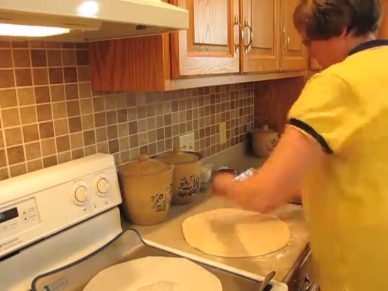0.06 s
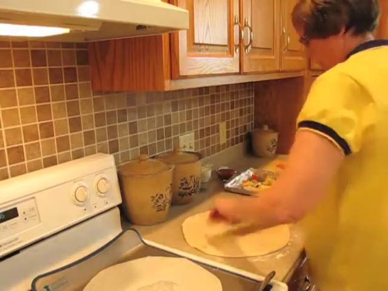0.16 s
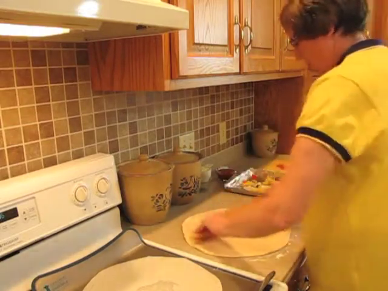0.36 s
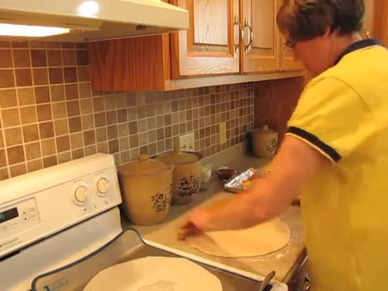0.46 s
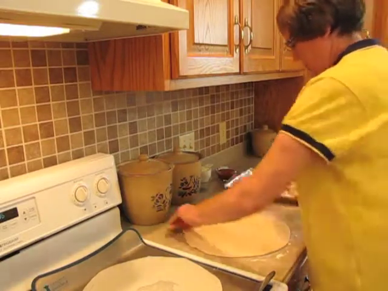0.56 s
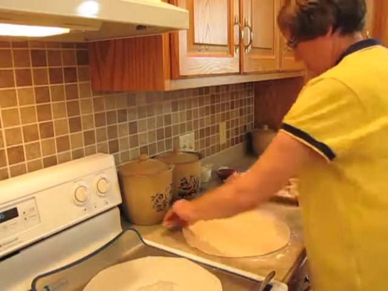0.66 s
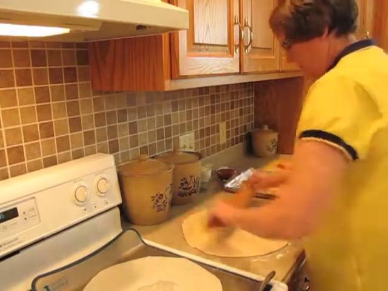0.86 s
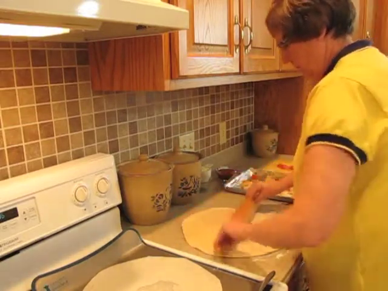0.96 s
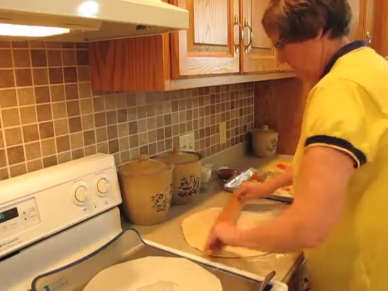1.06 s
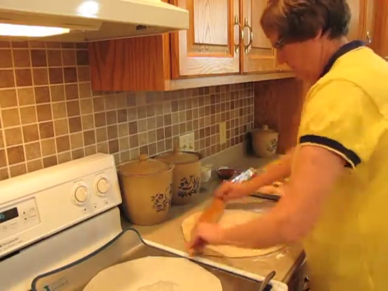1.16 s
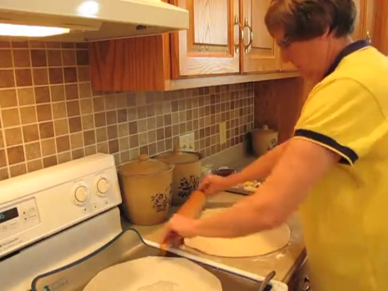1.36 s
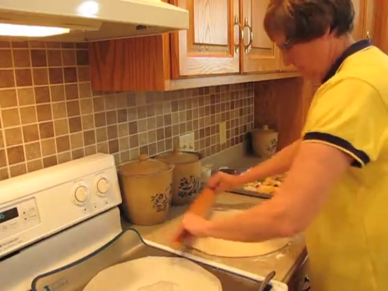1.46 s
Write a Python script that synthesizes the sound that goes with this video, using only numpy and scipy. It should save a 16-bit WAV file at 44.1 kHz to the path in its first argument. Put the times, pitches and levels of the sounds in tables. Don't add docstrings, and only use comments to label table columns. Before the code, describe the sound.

Rolling pin on a counter: brief axle rattle, one loud hard knock with a bright room tail, quieter rolling, sharp metallic clicks, then a soft thud and more rattling strokes; close small stereo microphone, slightly overloaded, faint air hush.

```python
import sys
import numpy as np
from scipy import signal
from scipy.fft import rfft, irfft, next_fast_len
from scipy.io import wavfile
from scipy.ndimage import map_coordinates

SR = 44100
rng = np.random.default_rng(int(sys.argv[2]) if len(sys.argv) > 2 else 0)


def generate_wav(sig):
    pcm = np.round(np.clip(np.atleast_2d(sig).T, -1, 1) * 32767).astype(np.int16)
    wavfile.write(sys.argv[1], SR, pcm)


def ratio(d):
    e = np.asarray(d, float) / 20
    return 10 ** e


N = 66150
KNOCK_S = 0.2392


def unit(x):
    return x / np.sqrt(np.mean(x ** 2) + 1e-20)


def along(points, hz):
    f, v = np.transpose(points)
    return np.interp(np.log(hz + 1), np.log(f + 1), v)


def filtered(x, response):
    m = next_fast_len(x.shape[-1] + SR // 4)
    spectrum = rfft(x, m) * response(np.fft.rfftfreq(m, 1 / SR))
    return irfft(spectrum, m)[..., :x.shape[-1]]


def shaped_noise(points, channels=()):
    return filtered(rng.standard_normal((*channels, N)), lambda hz: ratio(along(points, hz)))


def resonate(x, peaks):
    def response(f):
        total = 0
        for k, (centre, width, db) in enumerate(peaks):
            band = 1j * f * width
            total = total + (-1) ** k * ratio(db) * band / (centre * centre - f * f + band)
        return total
    return filtered(x, response)


def ring(modes, start_s, rise_s):
    t = np.maximum(np.arange(N) / SR - start_s, 0)
    body = sum(ratio(db - 60 * t / t60) * np.sin(2 * np.pi * hz * t) for hz, db, t60 in modes)
    return (1 - np.exp(-t / rise_s)) * body


# f/Hz, correlation
LIKENESS = [(60, 0.69), (300, 0.91), (700, 0.77), (1400, 0.69), (3100, -0.062), (6800, 0.094),
            (15000, 0.091)]


def spread(pair, share=1):
    def rotation(hz):
        angle = share * np.arccos(np.clip(along(LIKENESS, hz), -1, 1)) / 2
        return np.array([np.cos(angle), np.sin(angle)])
    mid, side = filtered(pair, rotation)
    return np.array([mid + side, mid - side])


# f/Hz, level/dB per Hz
AIR_SPECTRUM = [(25, 0), (120, 0.5), (600, 5), (1500, 8.5), (2700, -1.5), (5000, -1), (12000, -14.5),
                (16000, -26)]
AIR_DB = -55


def hush():
    return ratio(AIR_DB) * unit(spread(shaped_noise(AIR_SPECTRUM, (2,))))


CLICKS_PER_S, CLICK_SPREAD_DB = 6000, 2


def chatter():
    hit = rng.random(N) < CLICKS_PER_S / SR
    sign = np.sign(rng.standard_normal(N))
    return unit(hit * sign * ratio(CLICK_SPREAD_DB * rng.standard_normal(N)))


# t/s, peak level/dB, length/s, wood/dB, brightness/dB
AXLE_JOLTS = [(0.0505, -24, 0.015, 9.5, -1), (0.066, -34, 0.0042, -6, -10), (0.075, -33, 0.011, 16, 9.5),
              (0.6642, -13.5, 0.0027, -28, -1), (0.6688, -15, 0.0065, -32, -0.5),
              (0.6766, -16.5, 0.0029, -3.5, -3.5), (0.7924, -31, 0.0051, -10, 14.5),
              (0.8085, -30, 0.0082, -2, 0), (1.0026, -16.5, 0.01, -3, -1.5), (1.0078, -16, 0.0047, 8, 7),
              (1.013, -18.5, 0.004, -8, 5), (1.0163, -18.5, 0.0048, 16, 10), (1.028, -24.5, 0.01, 13, 0),
              (1.106, -26.5, 0.013, -4, 8.5), (1.2265, -30, 0.019, -2, 6.5),
              (1.3344, -20, 0.0058, 11.5, 6.5), (1.339, -18, 0.0067, 7, 2), (1.349, -23.5, 0.014, -2, -13)]
# t/s, peak level/dB, wood/dB, brightness/dB
MORE_AXLE_JOLTS = [(0.01, -46.5, 21.5, 12), (0.03, -43, 27, 11.5), (0.101, -38, 22, -13), (0.112, -56, 5, -12),
                   (0.137, -29.5, 1.5, -4), (0.147, -42, 4, 8), (0.199, -32.5, 8, 6.5), (0.453, -50.5, 8.5, 21),
                   (.489, -39.5, 8, 14), (0.532, -39.5, 6, 14), (.572, -40, 0, 11), (.586, -27.5, 0, 5.5),
                   (0.6314, -47.5, 17, 20.5), (1.0687, -18, 10.5, -10), (1.12, -31.5, 12, 5),
                   (1.154, -55, -13.5, 37), (1.174, -30, 16, 1), (1.197, -40.5, 10, 19.5),
                   (1.2054, -40, 14, 17.5), (1.2572, -36.5, 1, 19.5), (1.279, -32, 7, 12.5),
                   (1.298, -39, 20, 18), (1.316, -33.5, 11, 9.5), (1.383, -30.5, 10, -14), (1.4785, -30.5, 1, 9)]
# t/s, level/dB
ROLL_EFFORT = [(0, -42.5), (.05, -41.5), (.16, -55.5), (.2, -68), (.3, -33.5), (.45, -42.5), (.6, -48.5),
               (.7, -47), (.82, -50.5), (.99, -63), (1.02, -37), (1.1, -51), (1.18, -36), (1.3, -37),
               (1.4, -52), (1.47, -52), (1.5, -46)]
# f/Hz, width/Hz, level/dB
AXLE_LOW = [(2475, 139, 3), (2995, 226, 5), (3540, 236, -4.5), (3760, 193, -4.5), (2197, 410, -7)]
# f/Hz, width/Hz, level/dB
AXLE_HIGH = [(4350, 730, -10.5), (5150, 280, -0.5), (5877, 276, -2.5), (7400, 210, -2), (8250, 610, -5.5),
             (10070, 9500, -12), (6400, 9200, -14.5)]
# f/Hz, width/Hz, level/dB
BARREL_MODES = [(585, 80, -1), (1110, 80, 0), (1520, 180, 0), (1850, 200, -1), (330, 200, -10)]
TICK_S, RISE_S, FALL_POWER = 0.0076, 0.0006, 1.5
JOLT_DB, JOLT_BARREL_DB, JOLT_HIGH_DB = -9.5, -16, -6.5
ROLL_DB, ROLL_BARREL_DB, ROLL_HIGH_DB = -8, -12.5, -6.5
ROLL_LUMP_DB, LUMPS_PER_S = 5, 90


def axle():
    t = np.arange(N) / SR
    lumps = map_coordinates(rng.standard_normal(200), [t * LUMPS_PER_S])
    roll = ratio(np.interp(t, *np.transpose(ROLL_EFFORT)) + ROLL_DB + ROLL_LUMP_DB * lumps)
    drive = roll * ratio([[0], [ROLL_BARREL_DB], [ROLL_HIGH_DB]])
    ticks = [(s, db, TICK_S, wood_db, bright_db) for s, db, wood_db, bright_db in MORE_AXLE_JOLTS]
    for s, db, length_s, wood_db, bright_db in list(AXLE_JOLTS) + ticks:
        u = np.maximum(t - s + RISE_S, 0)
        burst = np.minimum(u / RISE_S, 1) * np.exp(-(u / max(length_s, 0.002)) ** FALL_POWER)
        colour = ratio([[0], [wood_db + JOLT_BARREL_DB], [bright_db + JOLT_HIGH_DB]])
        drive = drive + ratio(db + JOLT_DB) * burst * colour
    hits = chatter()
    rattle = 0
    for effort, peaks in zip(drive, (AXLE_LOW, BARREL_MODES, AXLE_HIGH)):
        rattle = rattle + resonate(effort * hits, peaks) / np.std(resonate(hits, peaks))
    return rattle


# t/s, level/dB, f/Hz, t60/s
MODE_TAPS = [(.054, -33.5, 960, 0.043), (.587, -29.5, 3740, .03), (.667, -42.5, 509, 0.1),
             (0.792, -35, 6130, 0.029), (.81, -47, 515, 0.1), (0.808, -34.5, 1843, 0.037),
             (.809, -35.5, 1557, 0.036), (1.008, -30, 579, 0.082), (1.01, -26, 1814, 0.11),
             (1.01, -35.5, 1078, 0.076), (1.177, -22.5, 3770, 0.025), (1.231, -35, 548, 0.063),
             (1.231, -23, 3780, 0.03), (1.233, -31, 1070, 0.018), (1.336, -35, 1620, 0.021),
             (.052, -22, 2606, 0.071), (.055, -22.5, 3060, 0.067), (0.081, -36, 2700, .025),
             (0.1, -36, 3010, .04), (0.112, -29, 2620, 0.023), (0.12, -44, 2530, 0.017),
             (0.136, -31, 3000, 0.049), (0.149, -36, 2550, 0.051), (0.2389, -29, 71, 0.026),
             (0.811, -36.5, 1170, 0.02), (1.002, -33, 202, 0.11), (1.004, -43, 687, 0.032),
             (.25, -35.5, 398, 0.22), (1.035, -35, 1113, 0.13), (1.106, -25.5, 5150, .035),
             (1.154, -32, 8200, .015), (1.2025, -24, 6580, 0.022), (1.2572, -28, 5810, 0.014),
             (1.2566, -33, 7500, 0.016), (1.2977, -26, 7040, 0.011), (1.299, -22, 8200, .015),
             (1.315, -29, 5180, .03)]
MOST_CYCLES, TAP_RISE_S = 170, 0.0016


def mode_taps():
    return sum(ring([(hz, db, min(t60, MOST_CYCLES / hz))], s, TAP_RISE_S) for s, db, hz, t60 in MODE_TAPS)


# f/Hz, level/dB, t60/s
KNOCK_MODES = [(217, -12, 0.08), (402, -10.5, 0.02), (590, -6, 0.029), (753, -5.5, 0.049),
               (880, 3.5, 0.012), (998, 2.5, 0.021), (1064, 3, 0.028), (1190, -4.5, 0.063),
               (1540, -2, 0.08), (1753, -4.5, 0.046), (2005, -5.5, 0.059), (2712, 2.5, 0.069),
               (3400, -14, 0.13), (4220, -11, 0.074)]
# f/Hz, level/dB
CRACK_SPECTRUM = [(600, -0.5), (1500, -6.5), (3000, 4), (4600, -7.5), (6700, -15.5), (7400, -2.5),
                  (8400, -6), (16000, -32.5)]
KNOCK_DB, KNOCK_RISE_S = -8.5, 0.000095
CRACK_DB, CRACK_LATE_S, CRACK_T60_S = -7.5, 0.00023, 0.011
JANGLE_DB, JANGLE_T60_S = -10.5, 0.097
GRAZE_DB, GRAZE_S = -9, 0.0003
LEAN_HZ = 177


def knock():
    since_touch = np.arange(N) / SR - KNOCK_S
    t = since_touch - CRACK_LATE_S
    fade = ratio(-60 * np.abs(t) / CRACK_T60_S) + ratio(JANGLE_DB - 60 * np.abs(t) / JANGLE_T60_S)
    crack = ratio(CRACK_DB) * fade * (t > 0) * unit(shaped_noise(CRACK_SPECTRUM))
    graze = -ratio(GRAZE_DB) * np.sin(np.pi * np.clip(since_touch / GRAZE_S + 1, 0, 1)) ** 2
    blow = ratio(KNOCK_DB) * ring(KNOCK_MODES, KNOCK_S, KNOCK_RISE_S) + crack + graze
    return filtered(blow, lambda hz: (1j * hz / (LEAN_HZ + 1j * hz)) ** 2)


# f/Hz, level/dB
WALL_SPECTRUM = [(100, -70), (220, -13.5), (390, -7), (1000, 4.5), (1700, 1.5), (2900, -3), (4000, -8),
                 (15000, -42)]
KNOCK_WET_DB, SNAP_DB, BEAM_S = -10, 11.5, 0.011


def knock_to_walls(blow):
    t = np.arange(N) / SR
    first = ratio(KNOCK_WET_DB) * blow * np.exp(-np.maximum(t - KNOCK_S, 0) / BEAM_S)
    impulse = 1.0 * (np.arange(N) == round(KNOCK_S * SR))
    snap = filtered(impulse, lambda hz: ratio(along(WALL_SPECTRUM, hz)))
    return first + ratio(SNAP_DB) * snap / np.linalg.norm(snap)


# t/s, level/dB
PUSHES = [
    (0.24, -44),
    (1.003, -33.5),
]
# f/Hz, level/dB, t60/s
SLAB_MODES = [(39.8, -9.5, 0.58), (127.4, -2.5, 0.19), (185, 6, 0.11), (209.3, -1, 0.13),
              (281.6, -14, 0.35)]
# f/Hz, level/dB
RUMBLE_SPECTRUM = [(20, -21), (45, -11), (90, -13), (250, -8), (500, -9), (1000, -46)]
PUSH_RISE_S, PRESS_S, LIFT_S, PRESS_FADE_S, RUMBLE_DB = 0.0071, 1.02, 1.33, 0.019, -57


def thuds():
    t = np.arange(N) / SR
    pressed = np.clip(np.minimum(t - PRESS_S, LIFT_S - t) / PRESS_FADE_S, 0, 1)
    rumble = ratio(RUMBLE_DB) * pressed * unit(shaped_noise(RUMBLE_SPECTRUM))
    return sum(ratio(db) * ring(SLAB_MODES, s, PUSH_RISE_S) for s, db in PUSHES) + rumble


SIDE_DB, LAG_S, DIRECT_SHARE = -1, 0.00003, 0.78


def direct(x):
    smear = np.diff(rng.standard_normal(600)) * np.exp(-np.arange(599) / 200)
    smeared = np.convolve(x, smear / np.linalg.norm(smear))[:N]
    pair = spread(np.array([x, smeared]), DIRECT_SHARE) * ratio([[SIDE_DB / 2], [-SIDE_DB / 2]])
    ears = np.array([[1], [-1]])
    return filtered(pair, lambda hz: np.exp(-1j * np.pi * hz * LAG_S * ears))


# f/Hz, t60/s
ROOM_DECAY = [(100, 0.19), (260, 0.5), (700, 0.7), (1840, 0.63), (3400, 0.51), (4850, 0.45), (12800, 0.53)]
# f/Hz, level/dB
ROOM_COLOUR = [(60, -37), (140, -5.5), (220, 4), (380, 3), (700, -7.5), (1500, 2), (3000, -0.5),
               (15000, -1.5)]
WALL_S = 0.0029


def kitchen(x):
    hz, t, z = signal.stft(rng.standard_normal((2, SR)), SR, nperseg=256)
    decay_db = -60 * t / along(ROOM_DECAY, hz)[:, None]
    tail = signal.istft(z * ratio(along(ROOM_COLOUR, hz)[:, None] + decay_db), SR, nperseg=256)[1]
    onset = np.clip(np.arange(tail.shape[1]) / SR / WALL_S - 1, 0, 1)
    tail = spread(tail) * onset
    return signal.fftconvolve(x[None], tail / np.linalg.norm(tail[0]), axes=1)[:, :N]


AXLE_WET_DB, TAP_WET_DB, THUD_WET_DB = -4.5, -4, -4


def scene():
    rattle, taps = axle(), mode_taps()
    blow, push = knock(), thuds()
    axle_room = ratio(AXLE_WET_DB) * kitchen(rattle + ratio(TAP_WET_DB) * taps)
    blow_room = kitchen(knock_to_walls(blow) + ratio(THUD_WET_DB) * push)
    return direct(rattle + taps + blow + push) + axle_room + blow_room + hush()


def band_limit(x):
    return signal.sosfilt(signal.butter(12, 15630, fs=SR, output="sos"), x)


CLIP_TOP, CLIP_HARDNESS, TOP_HZ = 1, 6, 15700


def record(dry):
    clipped = dry / (1 + np.abs(dry / CLIP_TOP) ** CLIP_HARDNESS) ** (1 / CLIP_HARDNESS)
    mix = filtered(clipped, lambda hz: hz < TOP_HZ)
    return band_limit(mix)


dry = scene()
out = record(dry)
generate_wav(out)
```